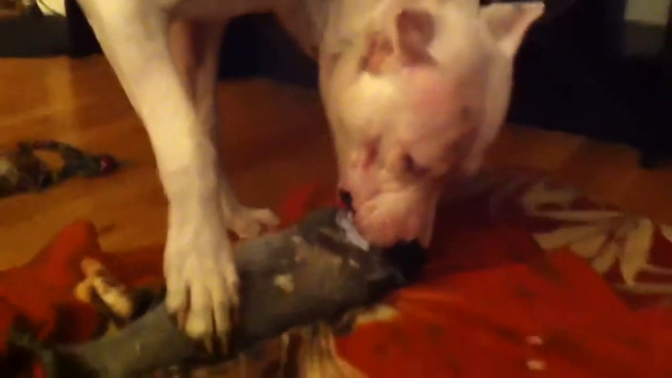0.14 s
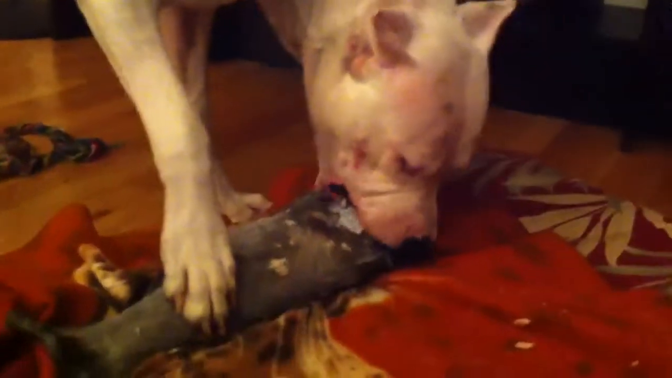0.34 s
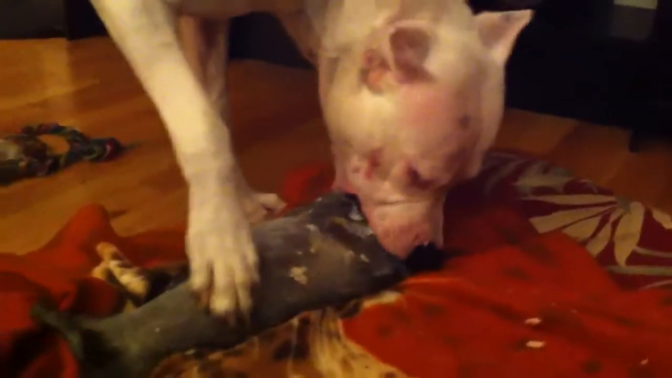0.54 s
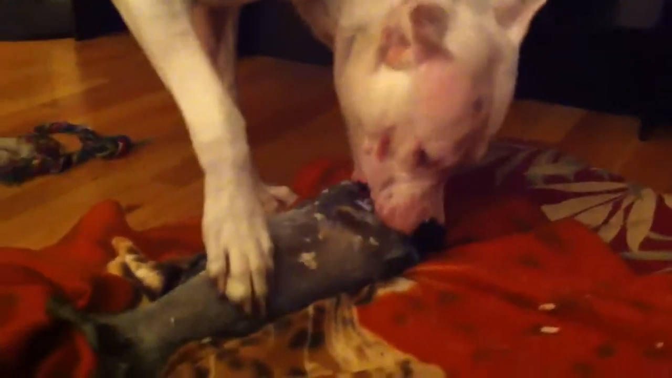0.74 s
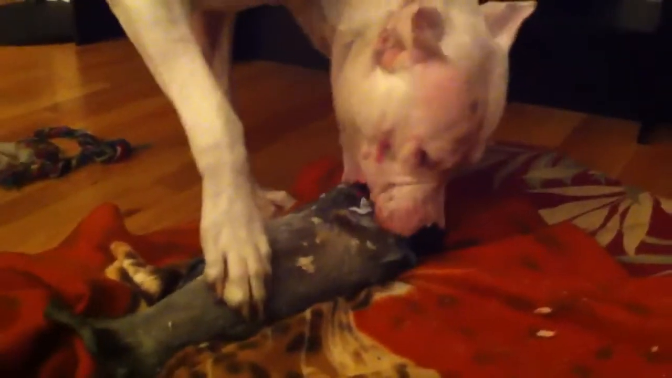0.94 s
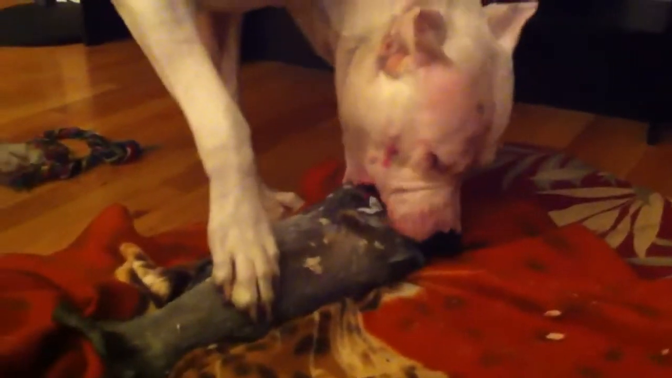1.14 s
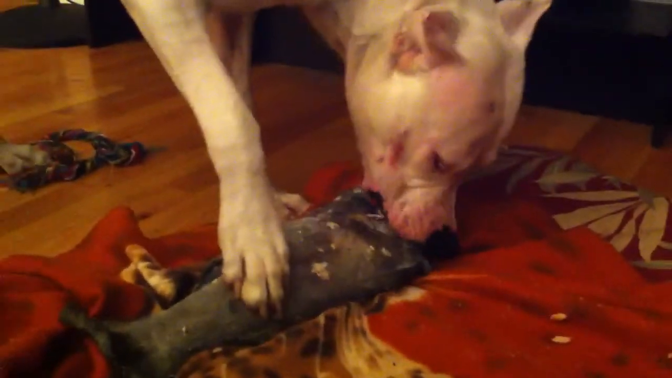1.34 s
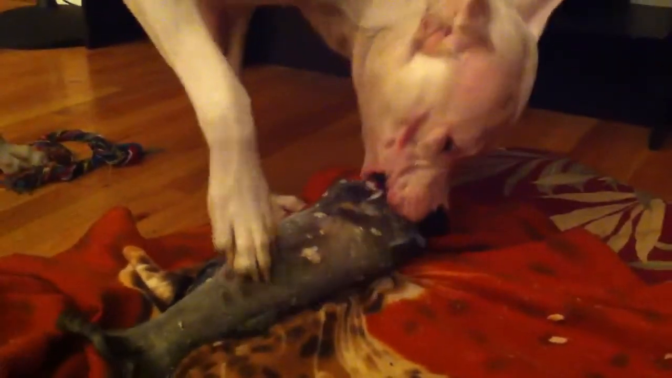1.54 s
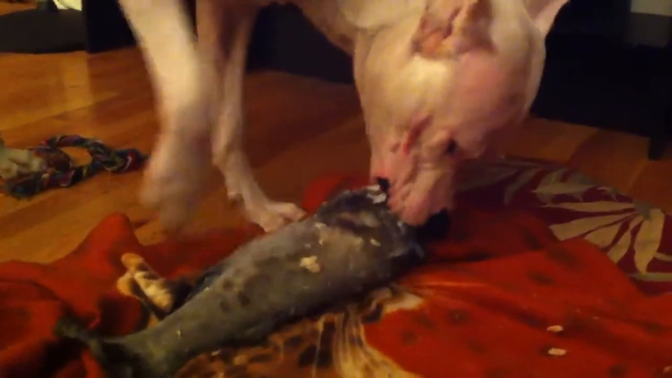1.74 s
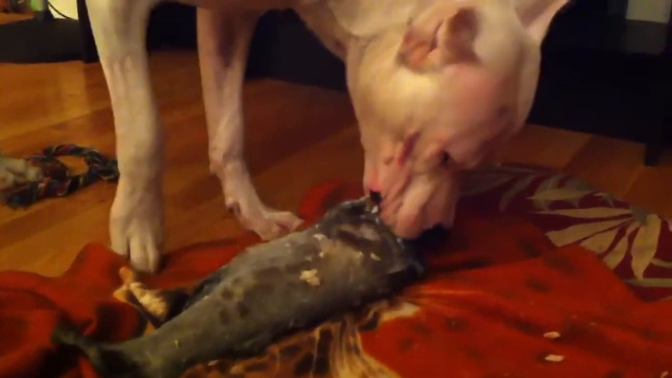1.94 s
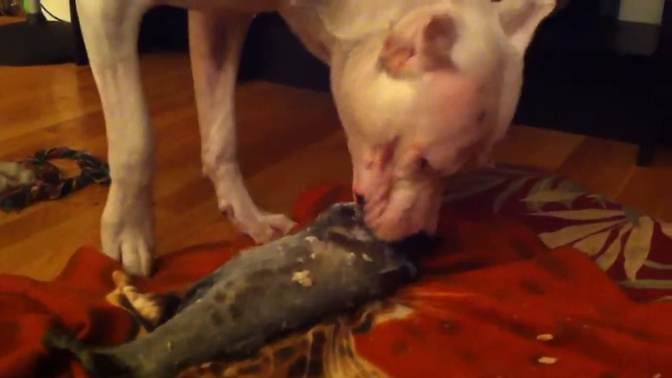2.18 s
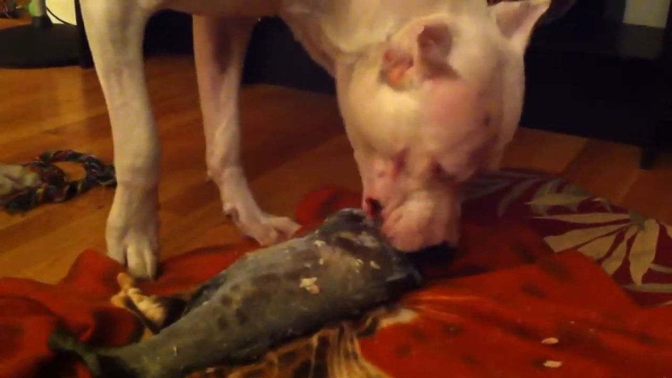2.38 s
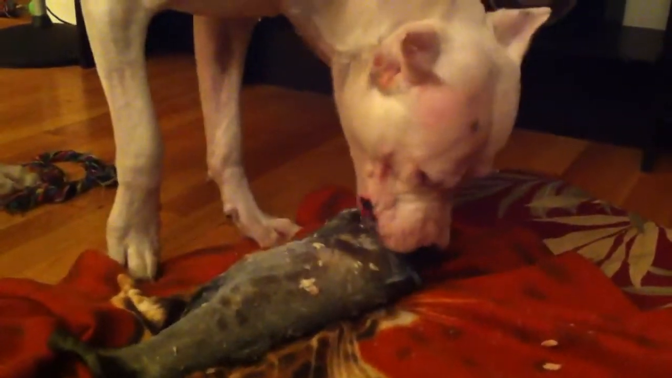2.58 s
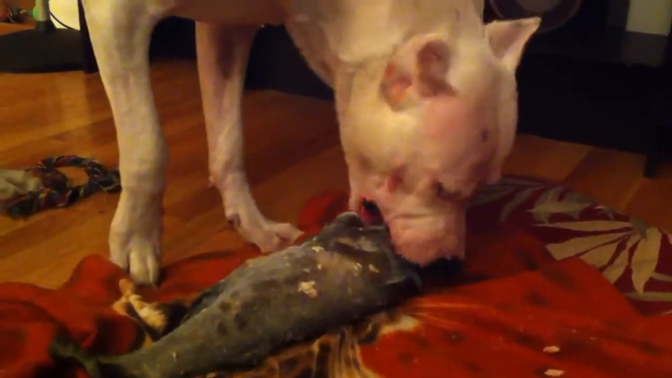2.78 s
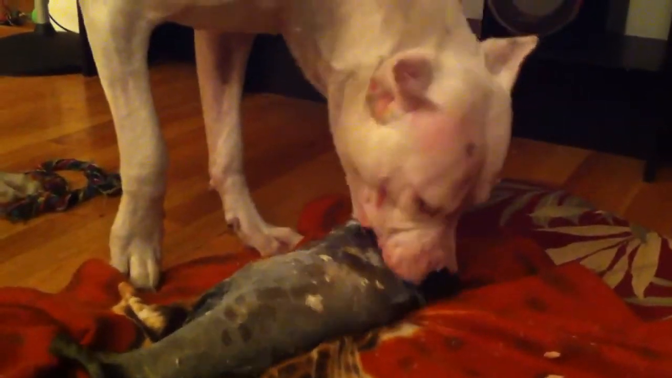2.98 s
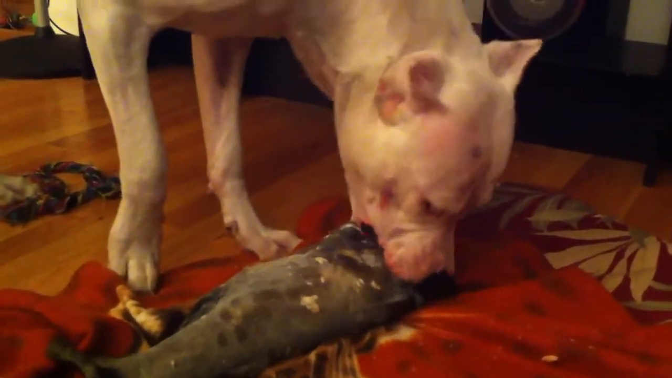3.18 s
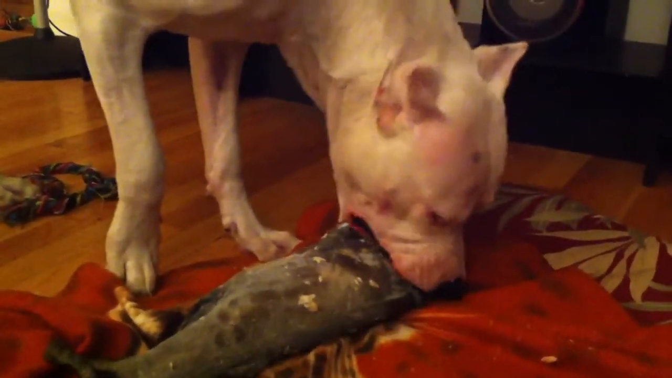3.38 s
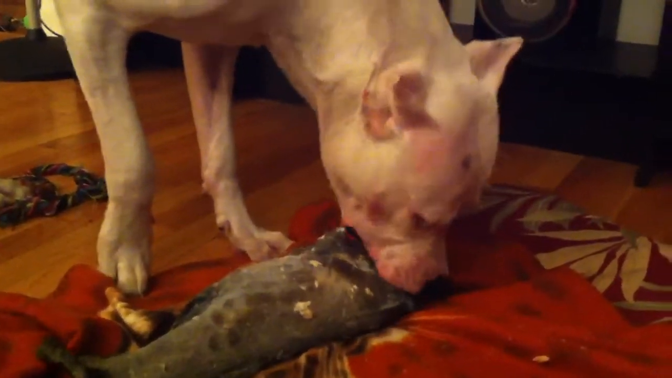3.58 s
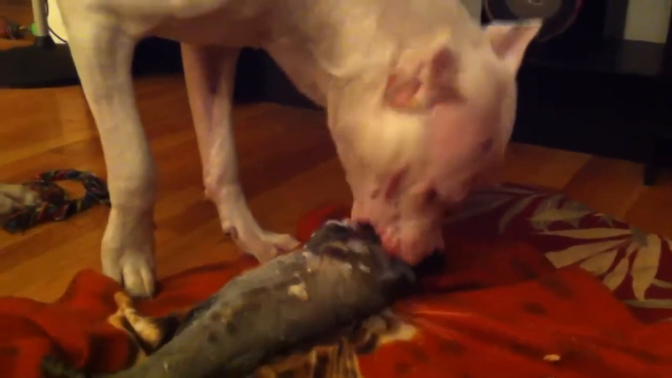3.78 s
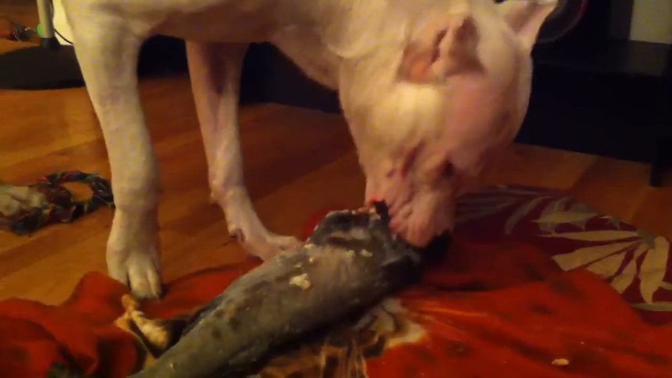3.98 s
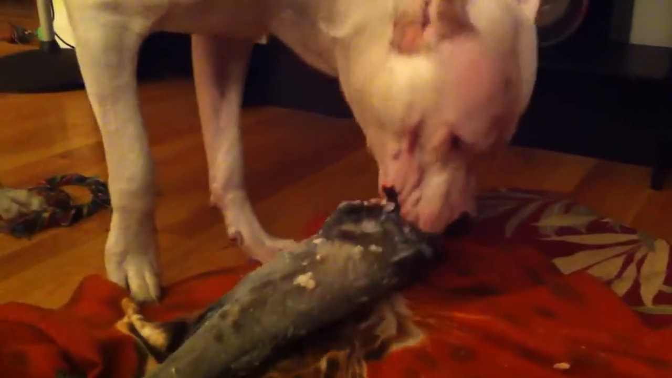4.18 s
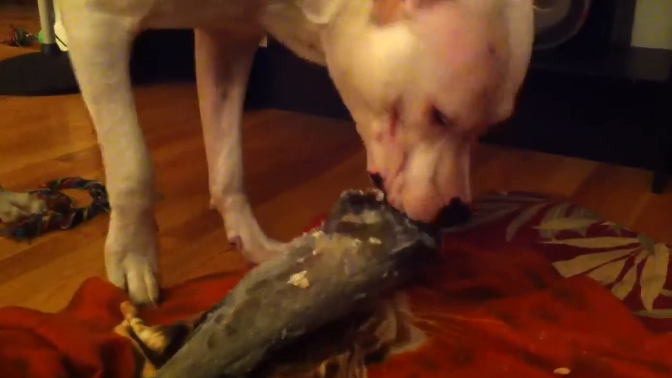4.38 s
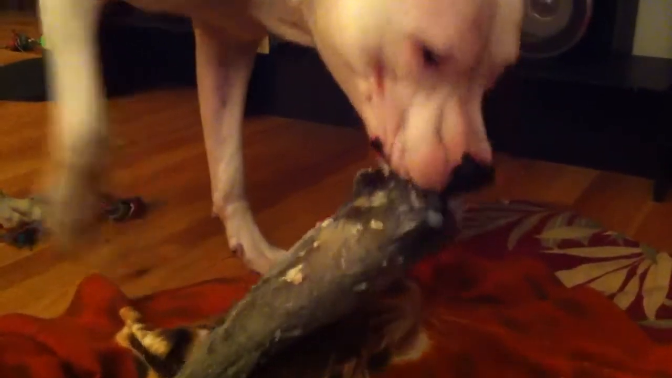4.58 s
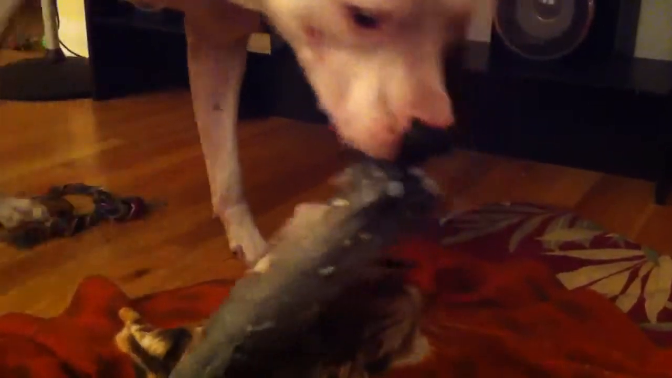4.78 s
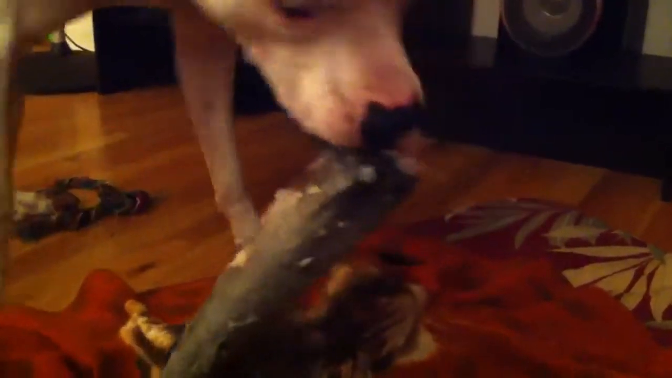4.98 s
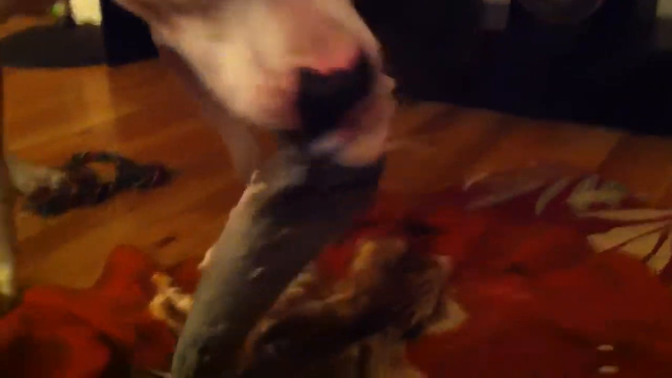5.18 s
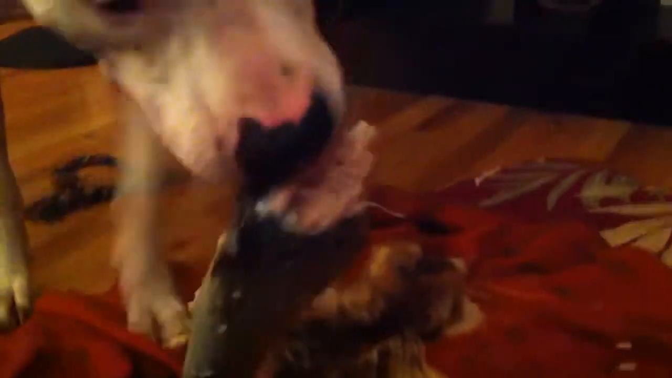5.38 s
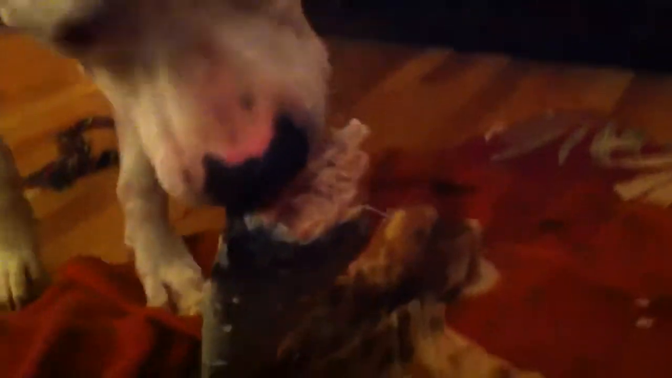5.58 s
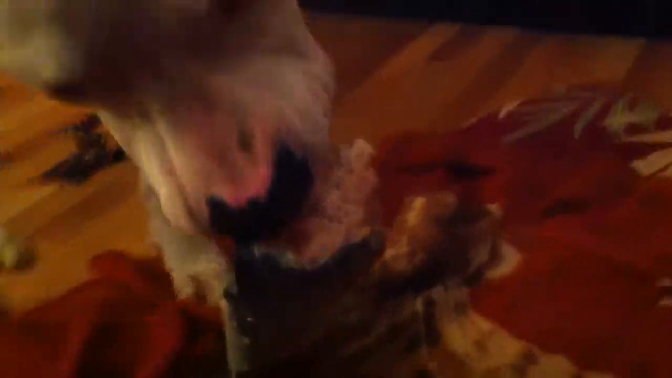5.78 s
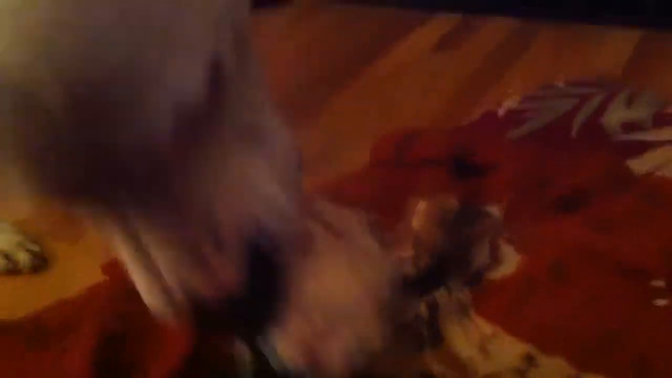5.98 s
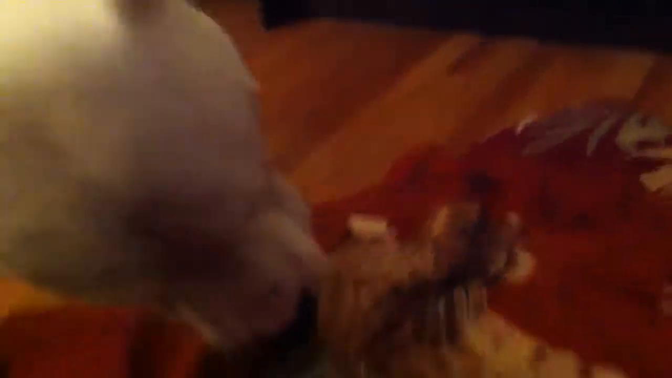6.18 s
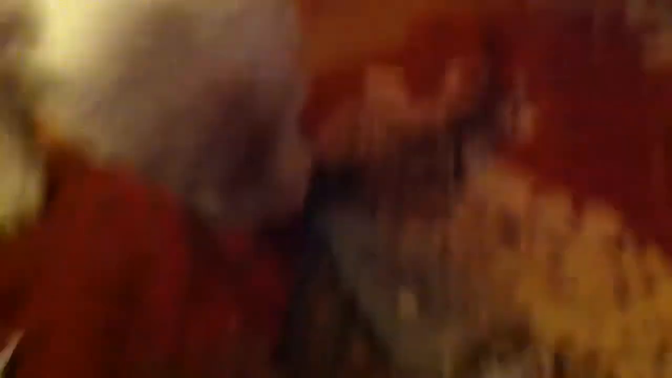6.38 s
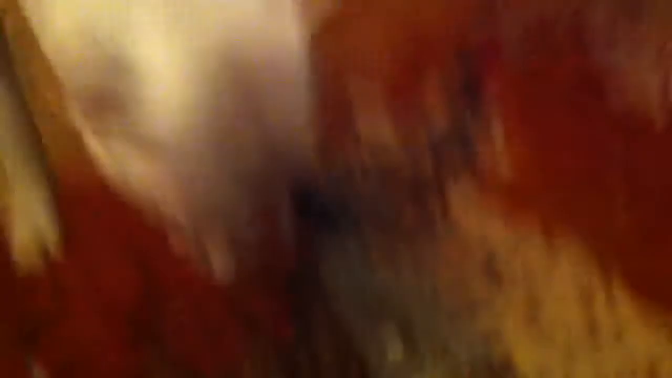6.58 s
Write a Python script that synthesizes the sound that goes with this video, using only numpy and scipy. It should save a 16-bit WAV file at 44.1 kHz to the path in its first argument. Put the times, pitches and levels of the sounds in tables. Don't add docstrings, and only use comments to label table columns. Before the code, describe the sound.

In a quiet wooden-floored room, a small close microphone catches a dog gnawing a raw fish. Irregular crunches, teeth clicks, crisp scale pops and wet smacks run over low rumble and faint hiss. A faint throat groan comes before a sparser stretch with dragging and paw knocks. Then tearing bites bunch up, and the fish drops with a bright wet slap and one loud boomy thump, followed by rustling cloth.

```python
import sys
import numpy as np
from scipy import signal
from scipy.fft import rfft, irfft, next_fast_len
from scipy.io import wavfile
from scipy.ndimage import uniform_filter1d

SR = 44100
rng = np.random.default_rng(int(sys.argv[2]) if len(sys.argv) > 2 else 0)


def generate_wav(sig):
    pcm = np.round(np.clip(np.atleast_2d(sig).T, -1, 1) * 32767).astype(np.int16)
    wavfile.write(sys.argv[1], SR, pcm)


def field_ratio(decibels):
    return 10 ** (np.asarray(decibels, dtype=float) / 20)


N = 292383


def rms_one(x):
    return x / np.sqrt(np.mean(x ** 2) + 1e-20)


def band(x, low_hz, high_hz):
    return signal.sosfilt(signal.butter(2, [low_hz, min(high_hz, 18000)], "band", fs=SR, output="sos"), x)


def drift(rate_hz):
    r = np.exp(-80 * np.pi * rate_hz / SR)
    slow = signal.lfilter([1], [1, -2 * r, r * r], rng.standard_normal(N // 40 + 2002))
    slow = slow[2000:]
    return np.interp(np.arange(N) / 40, np.arange(len(slow)), rms_one(slow))


def in_time(rows):
    s, *columns = np.transpose(rows)
    curves = []
    for column in columns:
        outside = [-150, -150] if column[0] < 0 else []
        curves.append(np.interp(np.arange(N) / SR, s, column, *outside))
    return curves


def ring(clicks, hz, t60):
    r = field_ratio(-60 / (t60 * SR))
    w = 2 * np.pi * min(hz, 16000) / SR
    return signal.lfilter([0, np.sin(w)], [1, -2 * r * np.cos(w), r * r], clicks + 1e-18)


def grains(level_db, centre_hz, low_hz, high_hz, per_s, cycles, scatter, spread_db, clump_db):
    sizes = field_ratio(spread_db * np.minimum(rng.exponential(1, N), 4)) * rng.choice([-1, 1], N)
    born = rng.random(N) < per_s * field_ratio(clump_db * drift(25)) / SR
    place = (np.log(centre_hz / low_hz) + scatter * rng.standard_normal(N)) / np.log(high_hz / low_hz)
    dealt = np.round(np.clip(place, 0, 1) * 13)
    rings = 0
    for k, hz in enumerate(np.geomspace(low_hz, high_hz, 14)):
        rings = rings + ring(sizes * born * (dealt == k), hz, cycles / hz) * hz / low_hz
    rings = band(rings, 0.27 * low_hz, 1.22 * high_hz)
    return field_ratio(level_db) * rings / np.sqrt(uniform_filter1d(rings ** 2, SR // 2) + 1e-12)


def snaps(rows, noisy, side_db, crack_db, swell, reach):
    length = 4000
    out, t = np.zeros(N + length), np.arange(length) / SR
    for s, db, hz, t60 in rows:
        push = noisy * rng.standard_normal(length) * field_ratio(-60 * t / (1.5 * t60))
        push[0] += 1
        main = ring(ring(push, hz, swell * t60), hz, .5 * t60)
        sides = ring(push, 1.44 * hz, 0.14 * t60) - ring(push, 0.61 * hz, 0.12 * t60)
        tone = main / np.abs(main).max() + field_ratio(side_db) * sides / np.abs(sides).max()
        crack = band(push * field_ratio(-60 * t / (.4 * t60)), .4 * hz, reach * hz)
        crack = band(crack, 300, 2500 + 1.4 * hz)
        contact = tone / np.abs(tone).max() + field_ratio(crack_db) * crack / np.abs(crack).max()
        at = round(s * SR)
        out[at:at + length] += field_ratio(db) * contact
    return out[:N]


def strokes(s, db, rise, fall, idle_db):
    coarse = np.arange(0, N, 32)
    late = coarse / SR - np.array(s)[:, None]
    stroke_db = np.array(db)[:, None] + np.where(late < 0, rise * late, -fall * late)
    power = np.interp(np.arange(N), coarse, np.sum(field_ratio(2 * stroke_db), axis=0))
    power = power * (idle_db > -140)
    return 10 * np.log10(power + field_ratio(2 * idle_db))


def room(x):
    t60_s, wall_cut_hz = 0.406, 2470
    size = next_fast_len(N + SR)
    hz = np.arange(size // 2 + 1) * SR / size
    dull = 1 / (1 + 1j * hz / wall_cut_hz)
    total = 0
    for k, lag in enumerate(np.geomspace(.0083, .029, 8)):
        loop = field_ratio(-60 * lag / t60_s) * dull * np.exp(-2j * np.pi * hz * lag)
        total = total + (-1) ** k * loop / (1 - loop)
    return irfft(rfft(x, size) * total, size)[:N]


def hiss():
    # f/Hz, density/dB per Hz
    hiss_curve = [(35, -79), (60, -36), (123, -12), (175, -2.5), (206, -26), (242, -4.5), (465, -12.5),
                  (793, -15), (851, -27), (934, -15), (1350, -18), (1450, -17.5), (15600, -28)]
    hz, level_db = np.transpose(hiss_curve)
    edges = 50 * 2 ** np.arange(0, 8.6, .5)
    out, white = 0, rng.standard_normal((2, N))
    for k, (low, high) in enumerate(zip(edges, edges[1:])):
        part = band(white[k % 2], low, high)
        part_db = np.interp(np.log(low * high) / 2, np.log(hz), level_db)
        out = out + part * field_ratio(part_db + .5 * drift(8.8))
    return field_ratio(-66.5) * rms_one(out)


def rumble():
    # f/Hz, width/Hz, level/dB
    room_modes = [
        (138.1, 6.5, -70.5),
        (177.04, 4.7, -69),
        (240, 51, -85.5),
    ]
    evenness = .6
    out = 0
    for hz, width_hz, db in room_modes:
        mode = rms_one(ring(rng.standard_normal(N), hz, 2.6 / width_hz))
        swell = np.sqrt(uniform_filter1d(mode ** 2, SR // 16) + .05)
        out = out + field_ratio(db) * rms_one(mode / swell ** evenness)
    return out


def gnawing():
    # t/s, bone crunch level/dB, crunch f/Hz, scale crackle level/dB
    bites = [(.08, -64, 2298, -67), (.15, -72, 2200, -65), (.31, -78, 2600, -64), (.63, -61, 1950, -64),
             (0.701, -64, 2140, -71), (0.814, -59, 2120, -63.5), (.895, -78, 2270, -78),
             (1.11, -68, 2560, -75), (1.4, -56.5, 2470, -63), (1.62, -65, 2020, -68),
             (1.734, -59, 2880, -61.5), (1.975, -62, 2110, -70.5), (2.115, -61, 2280, -58),
             (2.295, -59.5, 2580, -61.5), (2.484, -60, 2290, -61), (2.6, -65, 2440, -71),
             (2.8, -66.5, 2468, -64), (3.04, -80, 1800, -75), (3.17, -71, 2300, -68),
             (3.63, -62, 1760, -65), (3.71, -61.5, 2330, -64), (3.93, -64, 1890, -62),
             (4.2, -68, 1900, -78), (5.35, -68, 1920, -69), (5.46, -74, 2490, -65),
             (5.74, -62.5, 2370, -62), (6.004, -56.5, 3030, -63), (6.088, -53.5, 2500, -66),
             (6.17, -64, 2850, -64), (6.32, -59, 1890, -57)]
    # t/s, squelch level/dB, mouth cavity f/Hz
    squeezes = [(0.0, -72, 490), (.64, -52.5, 570), (.7, -61, 428), (.835, -69, 885), (1.12, -60, 406),
                (1.38, -67, 660), (1.43, -73, 710), (1.62, -66, 420), (1.99, -62.5, 468), (2.55, -65, 430),
                (3.0, -63.5, 327), (3.63, -62, 650), (3.67, -74, 910), (3.72, -66.5, 710),
                (3.79, -60.5, 590), (4.12, -60.5, 337), (4.66, -66, 337), (5.3, -71, 341.7),
                (5.72, -59, 408), (5.9, -60, 382), (6.09, -55.5, 765), (6.16, -55, 655), (6.32, -51.5, 537)]
    # t/s, level/dB
    mouthing = [
        (0.0, -69),
        (1.2, -71),
        (2.6, -68.5),
        (3.4, -70.5),
        (4.4, -73),
        (5.1, -71.5),
        (5.6, -67.5),
        (6.0, -63.5),
        (6.326, -62.5),
    ]
    t, (idle_db,) = np.arange(N) / SR, in_time(mouthing)
    bite_s, crunch_db, crunch_hz, crackle_db = np.transpose(bites)
    squeeze_s, squelch_db, mouth_hz = np.transpose(squeezes)
    bone_db = strokes(bite_s, crunch_db, 416, 164.5, idle_db - 6.5)
    scale_db = strokes(bite_s, crackle_db, 416, 164.5, idle_db)
    flesh_db = strokes(squeeze_s, squelch_db, 348, 118, idle_db - 5)
    bone = grains(bone_db - 3, np.interp(t, bite_s, crunch_hz), 1300, 5800,
                  per_s=2200, cycles=12, scatter=.28, spread_db=2.2, clump_db=3.5)
    crackle = grains(scale_db - 3, 10500, 6000, 15000,
                     per_s=3500, cycles=5, scatter=.4, spread_db=2.5, clump_db=3)
    flesh = grains(flesh_db - 5.5, np.interp(t, squeeze_s, mouth_hz), 300, 1000,
                   per_s=320, cycles=4.2, scatter=0.21, spread_db=2.0, clump_db=1.5)
    return bone + crackle + flesh


def smacks():
    # t/s, peak level/dB, f/Hz, t60/s
    smack_rows = [(0.077, -52, 363, 0.038), (0.275, -72, 322, 0.0196), (0.6162, -48, 563, 0.07),
                  (0.825, -48.5, 593, 0.04), (.846, -63, 900, 0.0245), (1.673, -53.5, 890, 0.051),
                  (1.767, -52, 310, 0.024), (2.29, -59, 770, 0.042), (2.9, -55, 356, 0.041),
                  (2.958, -54, 320, 0.039), (3.042, -60.5, 565, 0.16), (3.628, -55, 680, 0.055),
                  (5.017, -48.5, 390, 0.074), (5.878, -66, 344, 0.052), (6.05, -44, 785, 0.039),
                  (6.0805, -40, 670, 0.038), (6.082, -38, 1000, 0.014), (6.1025, -48, 920, 0.029),
                  (6.143, -43, 800, 0.016), (6.165, -35.5, 840, 0.025), (6.166, -50, 1030, 0.043),
                  (1.411, -49, 1130, 0.021), (.838, -52, 1050, .025)]
    return snaps(smack_rows, noisy=0.029, side_db=-8, crack_db=-4, swell=0.015, reach=8.6)


def teeth():
    # t/s, peak level/dB, f/Hz, t60/s
    clicks = [(.0795, -49, 1590, 0.012), (.1336, -47.5, 2260, 0.013), (.616, -45.5, 1750, 0.017),
              (.7144, -54, 1640, 0.01), (.817, -41, 2120, 0.013), (.8935, -50, 2210, 0.019),
              (.9115, -50, 2245, 0.017), (1.4105, -45.5, 2050, 0.0075), (1.606, -55, 3100, 0.011),
              (1.6727, -46.5, 1840, 0.025), (1.6996, -54, 1870, 0.018), (1.729, -49, 3100, 0.013),
              (1.8213, -53.5, 2980, 0.012), (1.982, -56, 2750, 0.018), (2.03, -51, 2800, 0.017),
              (2.2907, -47.5, 2020, 0.021), (2.322, -47.5, 2830, 0.011), (2.383, -54, 2150, 0.012),
              (2.4655, -50.5, 1675, 0.034), (2.5743, -48.5, 2580, 0.014), (2.6123, -56, 2980, 0.015),
              (2.8823, -49.5, 1090, 0.0074), (3.044, -49, 1770, 0.016), (3.1505, -45, 2565, 0.012),
              (3.1712, -46, 2260, 0.0166), (3.5932, -56, 3140, 0.012), (3.716, -55, 2540, 0.016),
              (3.968, -60, 1880, 0.018), (4.1877, -49, 2000, 0.015), (5.7326, -49.5, 1740, 0.013)]
    # t/s, peak level/dB, f/Hz
    nibbles = [(0.201, -56.5, 3700), (.2744, -55, 1710), (1.106, -59, 2920), (1.4628, -56, 2950),
               (1.625, -62, 1940), (1.801, -57, 2990), (1.952, -58, 2370), (2.2218, -56.5, 2260),
               (2.7727, -55, 1970), (2.8504, -55, 2980), (3.264, -57, 3330), (3.303, -59, 2070),
               (3.3581, -57.5, 2870), (3.47, -58, 3460), (3.576, -59, 3020), (3.727, -50, 2630),
               (3.778, -58, 2830), (2.665, -55.5, 3030), (3.214, -58, 3070), (4.2515, -57.5, 2105),
               (5.216, -72, 1571), (5.6367, -59, 2040)]
    nibble_t60_s = 0.018
    rows = [tuple(row) for row in clicks] + [(*row, nibble_t60_s) for row in nibbles]
    return snaps(rows, noisy=0.1, side_db=-9, crack_db=-7, swell=.12, reach=2.6)


def nips():
    # t/s, peak level/dB, f/Hz, t60/s
    nip_rows = [(.082, -48, 2950, .008), (.1135, -58, 1900, 0.011), (.277, -58, 850, 0.018),
                (.8935, -54, 2700, 0.013), (.9115, -50, 2780, 0.013), (1.606, -57, 1700, .01),
                (1.674, -54, 3070, .01), (1.982, -50, 2300, 0.0035), (2.035, -54, 1900, 0.0066),
                (2.0395, -51, 2300, 0.0031), (2.494, -54, 2600, .004), (2.612, -58, 1950, .01),
                (2.383, -53, 3020, 0.011), (2.462, -59, 1600, 0.013), (3.716, -53, 3480, .01),
                (5.998, -37.5, 2930, 0.0068), (6.049, -48, 700, .01), (6.1026, -40, 4200, .003),
                (6.111, -51, 900, 0.014), (6.136, -54, 1900, 0.0054), (6.171, -45.5, 895, 0.022),
                (6.175, -49, 3000, .006)]
    return snaps(nip_rows, noisy=.07, side_db=-6, crack_db=-5, swell=.1, reach=2.2)


def scales():
    # t/s, peak level/dB, f/Hz
    scale_rows = [(0.1101, -45.5, 10100), (0.1493, -48, 11500), (.1695, -57, 9900), (0.201, -51, 12300),
                  (0.4493, -52.5, 9300), (.587, -49, 9300), (0.81, -48, 7700), (1.084, -50, 13300),
                  (1.6406, -53, 12200), (1.723, -50, 11100), (2.1065, -41.5, 11400), (2.2157, -56, 9700),
                  (2.3221, -50, 12100), (2.3494, -47, 11600), (2.455, -49, 12600), (2.4783, -39.5, 11650),
                  (2.5654, -52, 13900), (2.649, -50, 9500), (2.7529, -44, 13400), (2.8203, -46, 13970),
                  (3.042, -52.5, 9700), (3.236, -52, 8440), (3.699, -48, 10600), (3.7269, -49, 14400),
                  (3.807, -47, 14600), (3.911, -50, 14000), (3.924, -47.5, 14600), (3.9454, -48, 13300),
                  (4.457, -51, 9140), (5.7302, -48, 9300)]
    rows = [(s, db, hz, .003) for s, db, hz in scale_rows]
    return snaps(rows, noisy=0.6, side_db=-2, crack_db=-20, swell=.05, reach=2.6)


def flakes():
    # t/s, peak level/dB, f/Hz
    flake_rows = [(0.1102, -57, 12500), (0.1487, -63, 14039), (0.1487, -60, 11455), (0.169, -56, 9500),
                  (0.3185, -62, 7100), (0.809, -65, 9216), (0.8119, -62, 13264), (1.4824, -62, 13522),
                  (2.0941, -62, 10594), (2.1057, -58, 9388), (2.1217, -59, 7579), (2.1253, -61, 13350),
                  (2.2146, -60, 12230), (2.478, -60, 13436), (2.4852, -62, 9043), (2.766, -60, 8613),
                  (2.7668, -60, 12144), (2.8205, -62, 8613), (3.041, -56, 9474), (3.9517, -52, 13178),
                  (4.4567, -59, 14400), (5.7309, -59, 9700), (5.9965, -69, 7665), (5.9965, -62, 11455),
                  (6.1017, -59, 11714), (6.1489, -62, 10938), (6.1607, -66, 9474), (6.1619, -65, 12661),
                  (6.1627, -64, 10852), (6.1714, -62, 9388)]
    rows = [(s, db + 7, hz, .005) for s, db, hz in flake_rows]
    return snaps(rows, noisy=0.45, side_db=-1.5, crack_db=-18, swell=0.15, reach=1.2)


def splinters():
    # t/s, peak level/dB, f/Hz
    splinter_rows = [(0.156, -59, 3014), (0.304, -63, 5598), (0.317, -63, 5598), (1.4258, -59, 4048),
                     (1.6254, -58, 1894), (1.6965, -62, 5254), (1.6986, -54, 3020), (1.7269, -65, 5081),
                     (1.7267, -60, 1981), (1.769, -65, 5167), (1.8207, -60.5, 1740), (2.047, -60, 5230),
                     (2.113, -63, 6201), (2.2907, -49, 3800), (2.348, -60, 3014), (2.3488, -58, 5340),
                     (2.3553, -61, 5512), (2.3633, -58, 3130), (2.364, -65, 1820), (2.462, -53.5, 1690),
                     (2.4728, -56, 1636), (2.478, -66, 6201), (2.5382, -60, 2325), (2.7914, -60, 2060),
                     (3.3088, -62, 2067), (3.5932, -69, 2928), (3.603, -59, 2940), (3.6629, -63, 4134),
                     (3.6665, -62, 1550), (3.6818, -60, 2756), (3.7507, -60, 2928), (3.774, -61, 3000),
                     (3.9648, -47.5, 1960), (5.0126, -63, 3730), (5.0146, -57, 5426), (5.2157, -60, 2411),
                     (5.7665, -61, 1820), (5.9508, -57, 5857), (5.9588, -53, 5254), (5.9878, -58, 3014),
                     (5.9976, -41, 2570), (6.0045, -60, 5684), (6.0052, -45, 3570), (6.0146, -63, 6029),
                     (6.0495, -65, 6459), (6.059, -55, 5943), (6.0611, -50, 2600), (6.0872, -51, 4220),
                     (6.0936, -50, 2900), (6.1033, -47, 5000), (6.1119, -49, 2160), (6.1162, -54, 5598),
                     (6.1424, -52, 3600), (6.1431, -50, 1981), (6.162, -59, 6400), (6.1772, -58, 5081),
                     (6.264, -58, 4565), (6.265, -62, 2000), (6.2955, -64, 4134), (6.3071, -55, 6115)]
    cycles = 44
    rows = [(s, db + 2.5, hz, cycles / hz) for s, db, hz in splinter_rows]
    return snaps(rows, noisy=.1, side_db=-7, crack_db=-10, swell=.2, reach=1.8)


def ticks():
    # t/s, peak level/dB, f/Hz, t60/s
    tick_rows = [(0.303, -63, 5600, 0.037), (0.808, -46.5, 3900, 0.0069), (1.4, -55, 4080, 0.018),
                 (1.6891, -64, 5280, 0.0123), (1.722, -57, 5240, 0.0125), (1.7494, -68.5, 4860, 0.0118),
                 (2.043, -57, 5250, 0.048), (2.1131, -62, 6200, 0.0136), (2.329, -55, 5500, 0.0136),
                 (5.44, -60, 4460, 0.0101), (5.7326, -47.5, 4100, 0.0074)]
    return snaps(tick_rows, noisy=0.46, side_db=-16, crack_db=-25, swell=0.018, reach=2.6)


def tear():
    # t/s, peak level/dB, f/Hz, t60/s
    tear_rows = [(.3175, -54, 3040, 0.0062), (0.8258, -45, 1440, 0.017), (.882, -54, 4830, 0.0046),
                 (.916, -57, 4200, .005), (1.7695, -47.5, 2500, 0.0025), (5.0135, -52, 1350, 0.003),
                 (5.9314, -52, 5260, 0.0097), (5.9511, -46.5, 2990, 0.0057), (5.9972, -61, 2560, 0.017),
                 (6.009, -51, 2200, 0.011), (6.016, -50, 2400, 0.0065), (6.0803, -31.5, 1920, 0.012),
                 (6.1022, -37, 2210, 0.01), (6.1428, -45, 1900, 0.0045), (6.1622, -37, 4380, 0.0019),
                 (6.1648, -31.5, 2270, 0.0085), (6.174, -47, 2000, 0.006), (6.257, -52, 1740, 0.0072),
                 (6.2906, -54, 1400, 0.035)]
    return snaps(tear_rows, noisy=.07, side_db=-6, crack_db=-4, swell=.12, reach=2.6)


def paws():
    # t/s, peak level/dB, f/Hz, t60/s
    paw_rows = [
        (0.708, -47.5, 168, 0.065),
        (1.364, -46, 184, 0.052),
        (5.07, -54.5, 145, 0.42),
        (5.153, -55, 222, 0.16),
        (5.18, -50, 213, 0.045),
        (5.294, -51, 161, 0.17),
        (5.33, -52, 222, 0.047),
        (5.436, -49, 150, 0.054),
        (6.165, -47, 208, 0.1),
        (6.606, -44, 171, 0.15),
    ]
    knocks = snaps(paw_rows, noisy=0.027, side_db=4.5, crack_db=-31, swell=0.017, reach=4.3)
    return band(knocks, 163.0, 480)


def hollow():
    openings = [
        (0.71, 0.098, -67.5, 590, 605),
        (0.83, 0.064, -71, 727, 729),
        (1.316, .18, -67, 540, 699),
        (3.578, 0.18, -68.5, 612, 756),
    ]
    width_hz = 106
    t, out = np.arange(N) / SR, 0
    even, odd = drift(width_hz), drift(width_hz)
    for s, length, db, from_hz, to_hz in openings:
        done = np.clip((t - s) / length, 0, 1)
        phase = 2 * np.pi * np.cumsum(from_hz + (to_hz - from_hz) * done) / SR
        swell = np.sqrt(np.abs(np.sin(np.pi * done))) * (done < 1)
        out = out + field_ratio(db) * swell * (even * np.cos(phase) + odd * np.sin(phase))
    return out


def groan():
    # t/s, f/Hz, level/dB
    groan_curve = [
        (3.8, 255, -93),
        (3.832, 240, -77),
        (3.898, 224, -72),
        (3.932, 244.6, -66),
        (3.986, 238.4, -76),
        (4.142, 240, -66),
        (4.192, 213, -80.5),
        (4.22, 208, -71),
    ]
    pitch_hz, level_db = in_time(groan_curve)
    phase = 2 * np.pi * np.cumsum(pitch_hz * (1 + 0.03 * drift(33))) / SR
    return np.sqrt(2) * field_ratio(level_db) * (np.sin(phase) + field_ratio(-15.0) * np.sin(2 * phase))


def drag():
    # t/s, level/dB
    drag_curve = [
        (4.95, -73),
        (5.05, -74.5),
        (5.32, -71),
        (5.55, -76),
        (5.8, -68),
        (5.94, -70.5),
        (6.0, -94),
        (6.326, -63),
    ]
    level_db, = in_time(drag_curve)
    return grains(level_db, 1300, 580, 1900, per_s=4800, cycles=4.3, scatter=.35, spread_db=2.5, clump_db=3.5)


def thump():
    # t/s, blow level/dB
    blows = [
        (6.33671, 11.8),
        (6.36254, 4.4),
        (6.44006, -22),
    ]
    # f/Hz, level/dB, t60/s
    boards = [(98.0, -34.2, .34), (138.4, -17.5, .29), (171.8, -18.7, .2), (196.5, -31, .3),
              (214.2, -33, .45), (226.2, -20, .104), (242.4, -39.9, .45), (257.9, -22.9, .165),
              (287.9, -16.5, .171), (304.4, -30.2, .262), (341.3, -16.8, .083), (353.8, -28.2, .269),
              (421.5, -31, .25), (534.7, -14.1, .193)]
    contact_s = 0.001
    force = np.zeros(N)
    for s, db in blows:
        force[round(s * SR)] = field_ratio(db)
    r = np.exp(-1 / (contact_s * SR))
    force = signal.lfilter([(1 - r) ** 2], [1, -2 * r, r * r], force + 1e-18)
    blow = 0
    for hz, db, t60 in boards:
        side = np.sign(200.25 - hz)
        blow = blow + side * field_ratio(db) * ring(force, hz, t60)
    blow = signal.sosfilt(signal.butter(4, 330, fs=SR, output="sos"), blow)
    return blow + field_ratio(-36) * room(blow)


def slap():
    # t/s, peak level/dB, f/Hz, t60/s
    slap_rows = [(6.337, -64, 9000, 0.0067), (6.3385, -44, 4000, 0.005), (6.341, -38, 8000, .006),
                 (6.3445, -25, 8360, 0.0058), (6.3455, -31, 4470, 0.0063), (6.3445, -30.5, 1550, 0.005),
                 (6.3462, -32, 9570, 0.0092), (6.3495, -35, 7500, 0.0038), (6.3535, -40, 9200, .005),
                 (6.354, -42, 4900, 0.023), (6.36, -46, 5150, 0.014), (6.498, -51, 3000, 0.0078),
                 (6.5824, -44.5, 2410, 0.034)]
    return snaps(slap_rows, noisy=0.28, side_db=-5, crack_db=-8, swell=.04, reach=1.5)


def settle():
    # t/s, strength level/dB
    settle_curve = [
        (6.349, -40.5),
        (6.365, -60),
        (6.547, -60.5),
        (6.581, -57.5),
        (6.603, -60),
        (6.63, -57.5),
    ]
    rustle_db, = in_time(settle_curve)
    late = np.maximum(np.arange(N) / SR - settle_curve[0][0], 0)
    flap_db = np.minimum(rustle_db + 3 + 17 * np.exp(-late / 0.065), -44)
    share = np.clip(0.62 * (1 - np.exp(-late / 0.11)), 0, 1)
    dull = rms_one(band(rng.standard_normal(N), 800, 5700))
    bright = rms_one(band(rng.standard_normal(N), 5400, 14700))
    rustle = (np.sqrt(1 - share) * dull + np.sqrt(share) * bright) * field_ratio(rustle_db + 0.63 * drift(31))
    flap = rms_one(band(rng.standard_normal(N), 110, 570)) * field_ratio(flap_db + 2.6 * drift(21))
    return rustle + flap


def scene():
    near = gnawing() + smacks() + teeth() + nips() + scales() + flakes() + splinters()
    near = near + ticks() + tear() + paws() + hollow() + groan() + slap()
    bed = hiss() + rumble() + drag() + settle()
    return (near + field_ratio(-18.5) * room(near) + thump() + bed)[None]


def top_cut(x):
    return signal.sosfilt(signal.butter(12, 15730, fs=SR, output="sos"), x)


def record(dry):
    x = signal.sosfilt(signal.butter(8, 95, "high", fs=SR, output="sos"), dry)
    x = signal.sosfilt(signal.ellip(8, .5, 60, 15600, fs=SR, output="sos"), x)
    x = x + field_ratio(-70.0) * signal.lfilter([.05], [1, -.95], rng.standard_normal(x.shape))
    return top_cut(x)


dry = scene()
out = record(dry)
generate_wav(out)
```